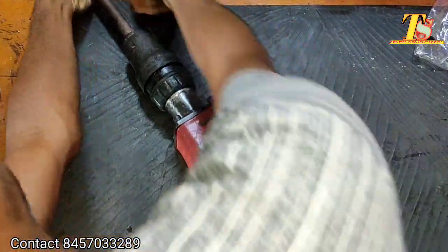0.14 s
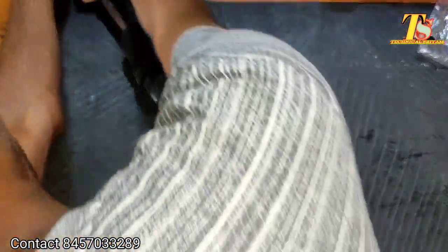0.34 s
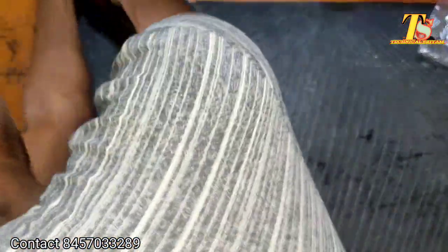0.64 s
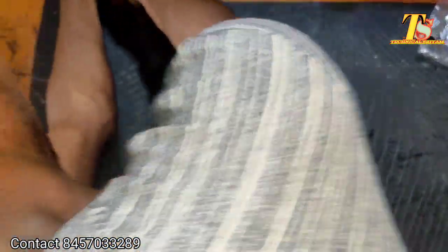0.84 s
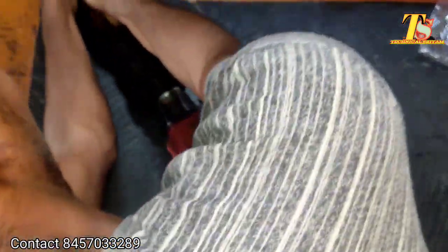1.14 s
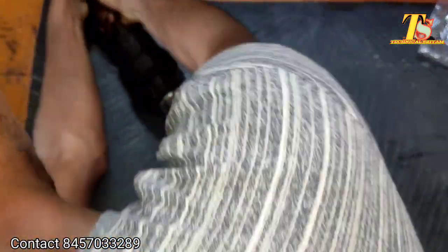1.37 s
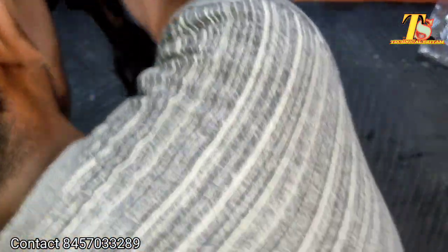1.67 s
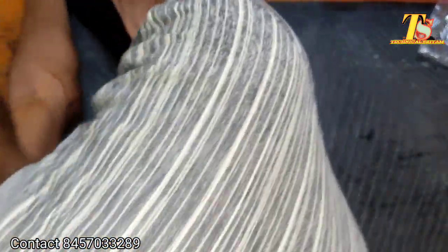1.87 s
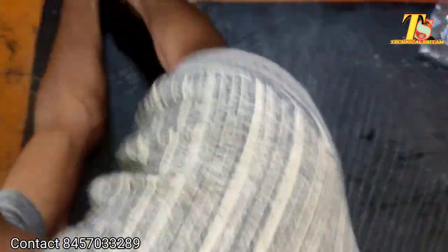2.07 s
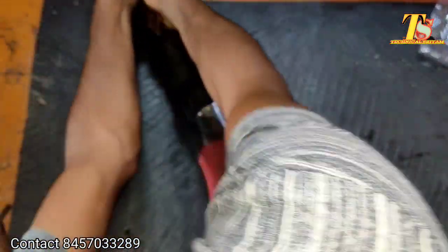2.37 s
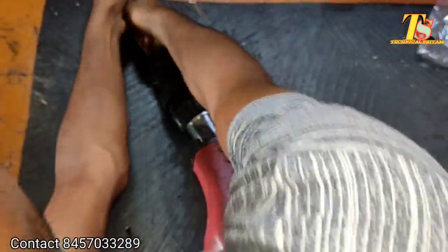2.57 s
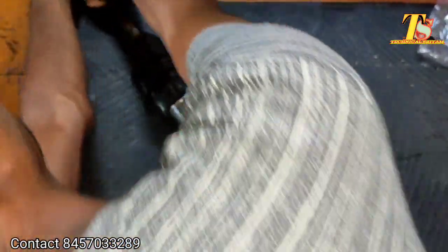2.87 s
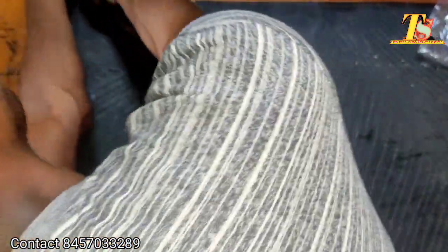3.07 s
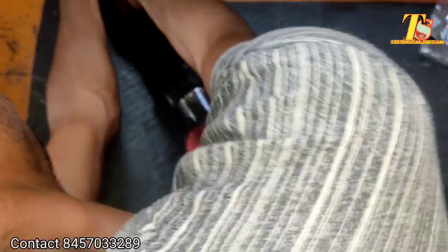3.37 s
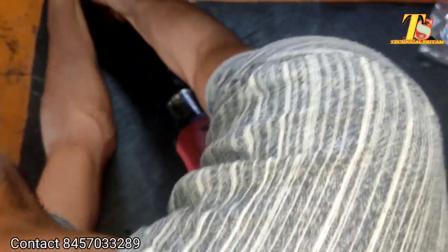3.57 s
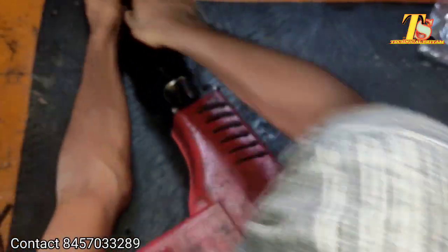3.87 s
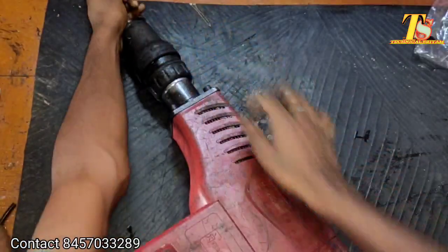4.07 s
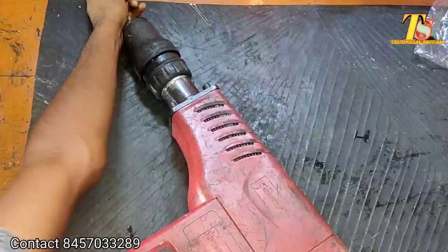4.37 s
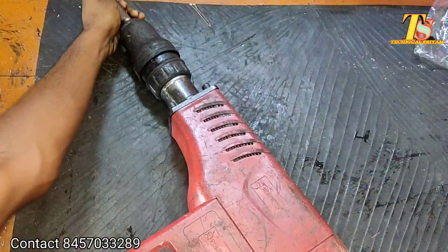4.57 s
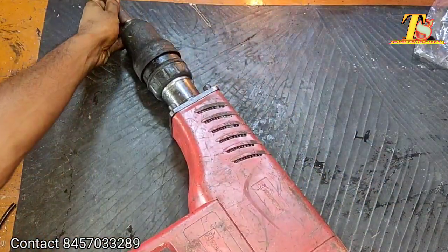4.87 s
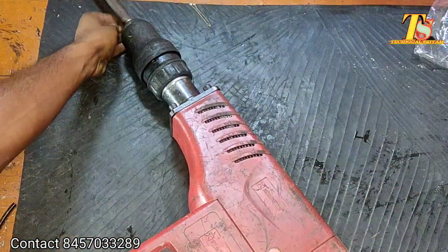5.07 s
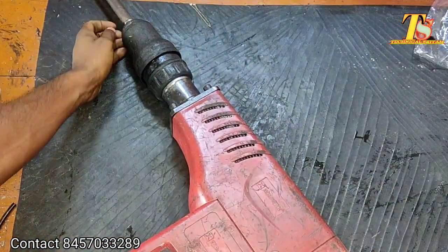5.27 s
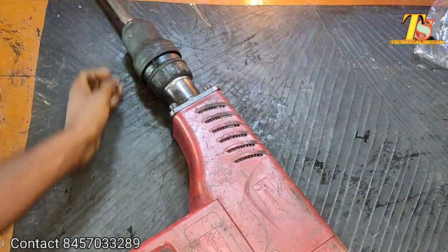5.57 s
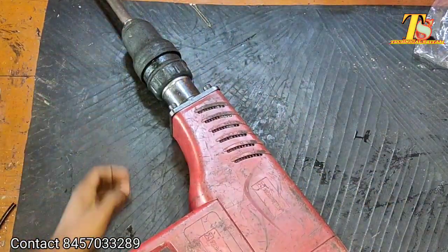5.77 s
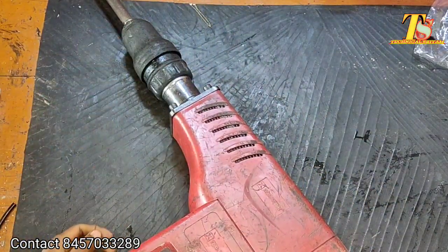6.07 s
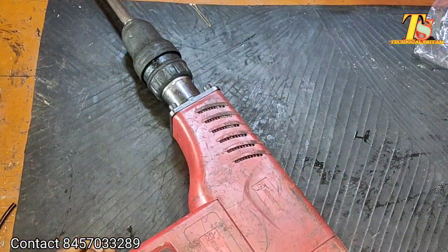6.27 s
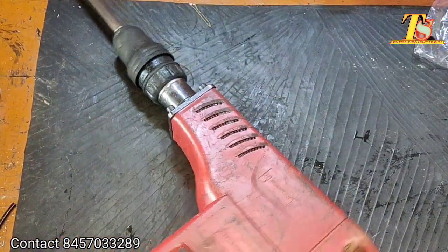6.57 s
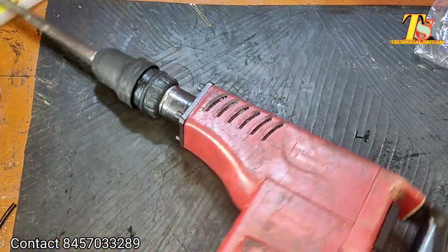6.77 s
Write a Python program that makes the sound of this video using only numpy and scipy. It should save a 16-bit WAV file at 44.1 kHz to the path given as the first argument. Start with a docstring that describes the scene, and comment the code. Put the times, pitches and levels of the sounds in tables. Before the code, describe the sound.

Close stereo pickup in a small workshop: an electric breaker idles with dense rattle, gear whine and fan hiss. Three times its chisel is pressed down, giving about a second of rapid, bright metallic blows as the whine sags and the floor booms. Between bursts it spins back up. After the last, the motor is switched off and the whine slides down while the rattle slows into separate knocks, ending with a scrape.

```python
"""A steady rattle, a gear whine and a fan's hiss come first: an electric demolition hammer idles on a workshop floor.
A motor turns the crank: gears whine by tooth meshing, loose parts rattle as noise bunched once a turn.
Three times the chisel is pushed home and rings as struck modes, the third time with a mere touch before and after.
Then the motor is switched off and coasts down, braked by friction and its fan; the floor booms under the recoil.
A gain control ducks the loud blows and recovers late."""
import sys
import numpy as np
from scipy import signal
from scipy.fft import rfft, irfft, next_fast_len
from scipy.io import wavfile
from scipy.ndimage import uniform_filter1d, minimum_filter1d, map_coordinates

SR = 44100
rng = np.random.default_rng(int(sys.argv[2]) if len(sys.argv) > 2 else 0)


def materialize(psi):
    """Save the field psi as 16-bit PCM at rate SR to the path in sys.argv[1].

    A 1-D psi becomes a single channel; in a 2-D psi each row is a channel.
    """
    bounded = np.clip(np.atleast_2d(psi).T, -1, 1)
    quanta = np.round(bounded * 32767).astype(np.int16)
    wavfile.write(sys.argv[1], SR, quanta)


N = 305169
TIME = np.arange(N) / SR


def undb(db):
    """Amplitude ratio from a level in dB."""
    return 10 ** (np.asarray(db) / 20)


def unit(x):
    """Normalisation to rms 1."""
    return x / np.sqrt(np.mean(x ** 2))


def curves(table):
    """Linear interpolation: the columns of a table as one value per sample."""
    s, *columns = np.transpose(table)
    return [np.interp(TIME, s, c) for c in columns]


def colour(x, points):
    """Spectral shaping: the gain follows (f/Hz, level/dB) points on a logarithmic frequency axis."""
    hz, db = np.transpose(points)
    size = next_fast_len(x.shape[-1] + 4096)
    f = np.maximum(np.fft.rfftfreq(size, 1 / SR), 1)
    gain = undb(np.interp(np.log(f), np.log(hz), db))
    return irfft(rfft(x, size) * gain, size)[..., :x.shape[-1]]


def resonate(x, hz, width_hz):
    """Simple resonance: one peak of gain 1 at its centre."""
    return signal.lfilter(*signal.iirpeak(hz, hz / width_hz, fs=SR), x)


def resonate_twice(x, hz, width_hz):
    """Cascaded resonance: two equal peaks in series have steeper flanks."""
    return resonate(resonate(x, hz, width_hz), hz, width_hz)


def walk(rate):
    """Random fluctuation: chance values, rate per s, joined by straight lines; rms 1."""
    return unit(np.interp(TIME * rate, np.arange(N), rng.standard_normal(N)))


def grains(rate, spread_db):
    """Shot noise: dense clicks of uneven size and random sign."""
    clicks = rng.random(N) < rate / SR
    return unit(clicks * rng.choice([-1, 1], N) * undb(spread_db * rng.standard_normal(N)))


def hump(s, half_s):
    """Gaussian envelope: a smooth swell around one moment."""
    return np.exp(-((TIME - s) / half_s) ** 2)


def spread(pair):
    """Interaural coherence: two unrelated signals reach both ears, their bass nearly alike in both."""
    mid, side = pair
    side = colour(side, [(200, -16.5), (500, -9.5), (1200, -3.0), (3000, -0.5)])
    return unit(np.array([mid + side, mid - side]))


def stereo_noise():
    """Two unrelated channels of white noise."""
    return rng.standard_normal((2, N))


# pushes on the chisel: start t/s, end t/s, blow level/dB, full loss of speed/(turns per s),
# time constant of that loss t/s, added gear whine level/dB
PUSHES = [(.79, 1.637, -.5, 6.36, .3744, -1.5), (2.048, 2.792, -.5, 4.734, .1666, 2.5),
          (3.298, 3.332, -17, 0, .3, 0), (3.333, 3.982, 2, 6.931, .4797, 4), (3.983, 4.02, -3, 0, .3, -4)]
# bending modes of the chisel: f/Hz, width f/Hz, level/dB
CHISEL = [(3395, 310, -18), (5494, 150, -13), (7693, 63, -0.5), (7960, 61, -13), (10670, 105, -3.5),
          (13800, 65, -3.5)]
# broad crack of steel on steel: f/Hz, level/dB
CRACK = [(300, -19), (1200, 16), (3500, 6.5), (7000, 8), (9000, 8), (11300, 16.5), (12500, -22.5)]
BLOW_DB = -9
SEAT_SHIFT_S = 4.5e-5  # the chisel shifts in its seat: rms wander of the ring's arrival time
PORT_LAG = -7  # samples; negative: the ring reaches the right port first


def blows(turns, lag=.15, bounce_db=-2, crack_db=-8.0, contact_s=0.005, chatter_db=-21, grind=0.9,
          uneven_db=1.5):
    """Impact excitation of bending modes: once a turn the striker hits the chisel, which rings and bounces."""
    count = 6  # the blow and five bounces
    hits = np.interp(np.arange(int(turns[-1])) + lag, turns, TIME)
    place, size = rng.random((len(hits), count)), rng.standard_normal((len(hits), count))
    order = np.arange(count)
    times = hits[:, None] + .0056 * (order + (order > 0) * (place - .5) * 1.4)
    bounces_db = (order > 0) * (bounce_db + 3.5 * size)
    # each bounce is weaker on average
    sizes = undb(bounces_db - 2.66 * order + uneven_db * size[:, :1])
    taps = np.zeros(N)
    for start, end, db, *_ in PUSHES:
        pressed = (hits > start) & (hits < end)
        taps[(times[pressed] * SR).astype(int)] = sizes[pressed] * undb(db)
    # each contact is a hard tap with a short grinding burst, followed by fine chatter
    t = TIME[:SR // 4]
    decay = np.exp(-t / contact_s) + undb(chatter_db) * np.exp(-t / 0.04)
    force = signal.fftconvolve(taps, decay)[:N]
    contact = unit(taps) + grind * unit(force * stereo_noise())
    ring = unit(sum(undb(db) * resonate(contact, hz, width) for hz, width, db in CHISEL))
    # the shifting seat makes the ring waver in pitch
    seated = np.arange(N) + SEAT_SHIFT_S * SR * walk(120)
    ring = np.array([map_coordinates(side, [seated], mode="nearest") for side in ring])
    ring[1] = np.roll(ring[1], PORT_LAG)
    crack = unit(colour(force * stereo_noise(), CRACK))
    busy = sum(end - start for start, end, *_ in PUSHES) / TIME[-1]  # share of the time spent pushing
    return undb(BLOW_DB) * np.sqrt(busy) * unit(ring + undb(crack_db) * crack)


# free speed (turns per s), time constant of regaining it (s), start within the turn (turns)
FREE_SPEED, RECOVER_S, START_TURN = 29.802, .2985, .088
# switch-off (s), friction (turns per s per s), speed at which fan and friction brake alike (turns per s)
OFF_S, FRICTION, EVEN_SPEED = 4.487, 5.9855, 21.043


def crank():
    """Torque balance: the speed (turns per s) sags under load, recovers, and falls by friction and fan drag."""
    speed = np.full(N, FREE_SPEED)
    for start, end, _, sag, sag_s, _ in PUSHES:
        bogged = 1 - np.exp(-np.clip(TIME - start, 0, end - start) / sag_s)
        speed = speed - sag * bogged * np.exp(-np.maximum(TIME - end, 0) / RECOVER_S)
    # constant friction with drag as speed squared gives a tangent law
    off_angle = np.arctan(np.interp(OFF_S, TIME, speed) / EVEN_SPEED)
    braked = off_angle - FRICTION / EVEN_SPEED * (TIME - OFF_S)
    return np.where(TIME < OFF_S, speed, EVEN_SPEED * np.tan(braked))


GRIP_S = 0.048  # time constant for the load to take hold or let go


def pushing():
    """First-order lag: firmness of the push (0-1), and its extra gear whine (dB)."""
    held = sum(((TIME > start) & (TIME < end)) * np.array([[1.], [whine_db]])
               for start, end, *_, whine_db in PUSHES)
    keep = np.exp(-1 / (GRIP_S * SR))
    return signal.lfilter([1 - keep], [1, -keep], held)


def stroke(turns, centre, width):
    """Periodic compression: a hump once a turn, as the piston squeezes its air cushion; rms 1."""
    phase = (turns - centre + .5) % 1 - .5
    return unit(np.exp(-.5 * (phase / width) ** 2))


# resonances of the housing: f/Hz, width f/Hz, level/dB
HOUSING = [(345, 29, 2), (585, 200, -3), (850, 120, -1), (1090, 130, -2.5), (1540, 120, -5.5),
           (2045, 72, 2), (2540, 300, -4), (3040, 72, -9), (3720, 146, 2), (4140, 200, -8),
           (6560, 240, -1.5), (6900, 200, -7)]


def housing(x):
    """Modal ringing: knocks excite the housing's resonances, whose levels wander as the point of impact does."""
    vary_db, knocks_per_s = 3.5, 16
    return sum(undb(db + vary_db * walk(knocks_per_s)) * resonate(x, hz, width)
               for hz, width, db in HOUSING)


# colour of the rattle at speed: f/Hz, level/dB
RATTLE = [(120, -68), (190, -1), (235, -21), (285, -40), (340, -29), (400, 5.5), (720, 10), (870, 5.5),
          (1130, 16), (1400, 7.5), (2400, 2.5), (2950, -4.5), (3450, 4.5), (3950, 3.5), (4500, -9.5),
          (7000, -9), (14000, -2.5)]
# colour of the rattle when coasting: f/Hz, level/dB
COAST = [(60, -50), (105, 7), (150, -16), (225, 0.5), (295, 1), (420, 7), (620, 10.5), (780, 4.5),
         (1150, 6), (1420, 0.5), (2000, -3.5), (2600, -3.5), (3600, -2), (4100, -1), (4800, -6),
         (6000, -9.5), (9000, -11), (14000, -31)]
# level at free speed (dB), change under a push (dB), fall (dB per octave of speed lost)
RATTLE_DB, RATTLE_PUSHED_DB, RATTLE_FALL_DB = -29.5, 3, 1.9
# below this speed (turns per s) the rattle fades faster (further dB per octave)
LIMP_SPEED, LIMP_FALL_DB = 11.2, 6
# share that is one knock a turn (0-1): at free speed, gained per octave of speed lost, upper limit
KNOCK_SHARE, KNOCK_PER_OCTAVE, KNOCK_MOST = 0.25, 0.4, 0.6


def rattle(turns, speed, knock, ring_fast_db=-7, ring_slow_db=5):
    """Modulated shot noise: gear play and piston chatter bunch at each compression; slow running rings more."""
    knock = np.clip(knock, 0, 1)
    load = np.sqrt(1 - knock + knock * stroke(turns, centre=0.0012, width=0.082) ** 2)
    uneven = undb(.7 * walk(45) + 1.5 * walk(400))
    chatter = spread([grains(rate=5000, spread_db=1.5) for _ in range(2)]) * load * uneven
    ring = housing(chatter)
    roar = unit(colour(chatter + undb(ring_fast_db) * ring, RATTLE))
    clatter = unit(colour(chatter + undb(ring_slow_db) * ring, COAST))
    fast = np.clip((speed - 14) / 13, 0, 1)
    return np.sqrt(fast) * roar + np.sqrt(1 - fast) * clatter


# pitch of the gear whine while the motor is powered: t/s, f/Hz
WHINE = [(0, 1780), (.8, 1775), (1.05, 1690), (1.2, 1520), (1.62, 1480), (1.8, 1590), (2.05, 1710),
         (2.22, 1690), (2.35, 1530), (2.8, 1480), (3.0, 1610), (3.3, 1740), (3.55, 1710), (3.67, 1610),
         (3.76, 1510), (3.98, 1480), (4.2, 1610), (4.487, 1730)]
# squeals as the freed motor picks up: t/s, half length t/s, level/dB against the whine
SQUEALS = [(1.87, .04, 1), (1.95, .03, -1), (3.01, .07, -3), (4.17, .03, -5)]
# how the gearbox radiates the mesh of the teeth: f/Hz, level/dB
GEARBOX = [(340, 4), (400, -2), (480, 4), (620, 10), (720, 2), (820, 6), (980, 2), (1130, 9), (1350, -1),
           (1450, 2.5), (1580, 0), (1780, 3), (2200, -4), (2650, -8), (2950, 2), (3250, 4), (3450, 1),
           (3650, 3.5), (4200, -12), (5500, -18)]
GEAR_TEETH = 60  # tooth contacts per turn of the crank, heard once the motor is off
# level at free speed (dB), change under a push (dB), fall (dB per octave of speed lost)
GEAR_DB, GEAR_PUSHED_DB, GEAR_FALL_DB = -35.5, 12, .3
GEAR_STRAIN_DB, GEAR_LIMP_DB = 7.5, 7.5  # growth at full strain (dB); fall at a crawl (dB per octave)
FREE_WHINE_HZ, STRAIN_HZ = 1780, 290  # free pitch, and its drop at full strain
SLACK_RASP_HZ, SLACK_RASP_WIDTH_HZ, SLACK_RASP_DB = 3700, 700, -10  # slack teeth grate in the gear case
COAST_WHINE_DB = 3  # rise of the fundamental when coasting
CRAWL_SPEED, CRAWL_OVERTONE_DB = 13, 11  # below this speed (turns per s) the overtones grow (dB)


def gears(turns, speed, pushed, gear_db, surge=0.013, flutter=0.055, strain_flutter=.035,
          slack_flutter=.015, second_db=-6, third_db=-8, rasp_db=-11):
    """Tooth-mesh tone: compression loads the teeth, and the crank springs forward past dead centre."""
    slack = 1 - pushed  # slack teeth whirr all the way round, with more overtones
    coasting = np.clip((24 - speed) / 4, 0, 1)
    crawling = np.clip((CRAWL_SPEED - speed) / 5, 0, 1)
    hz = np.where(TIME < OFF_S, curves(WHINE)[0], GEAR_TEETH * speed)
    strain = pushed * np.clip((FREE_WHINE_HZ - hz) / STRAIN_HZ, 0, 1)
    # phase of the mesh in cycles, then in radians with its own flutter at each ear
    surging_hz = hz * (1 + surge * np.cos(2 * np.pi * turns))
    mesh = np.cumsum(surging_hz) / SR + 0.32 * (1 - .35 * coasting) * walk(35)
    squeal = np.sin(4 * np.pi * mesh) * sum(undb(db) * hump(s, half_s) for s, half_s, db in SQUEALS)
    depth = flutter + strain_flutter * strain + slack_flutter * slack * (1 - coasting)
    mesh = 2 * np.pi * (mesh + depth * np.array([walk(350), walk(350)]))
    overtones = undb(second_db) * np.sin(2 * mesh) + undb(third_db) * np.sin(3 * mesh)
    # a strained whine throbs more: its steady part shrinks
    squeeze = (1 - .5 * slack) * (1 - .3 * coasting) * stroke(turns, centre=0.01, width=0.085)
    steady = .34 + .35 * (1 - strain) * (1 - .5 * pushed) + .2 * coasting
    pressure = (steady + squeeze) * undb(1.4 * walk(40))
    # at speed the sliding teeth also rasp, which rings the gear case
    rasp = unit(resonate_twice(stereo_noise(), 1730, 260)) * (1 - coasting) * (1 - strain)
    grate = unit(resonate_twice(stereo_noise(), SLACK_RASP_HZ, SLACK_RASP_WIDTH_HZ))
    grate = grate * undb(SLACK_RASP_DB) * (1 - coasting)
    fundamental = np.sin(mesh) * undb(COAST_WHINE_DB * coasting)
    whirr = slack * (overtones * undb(CRAWL_OVERTONE_DB * crawling) + grate)
    teeth = fundamental + whirr + squeal + undb(rasp_db) * rasp
    return unit(colour(teeth * pressure, GEARBOX)) * undb(gear_db + GEAR_STRAIN_DB * strain)


# short clacks and bursts of the machine: t/s, level/dB, pitch f/Hz, bright tick level/dB, decay t/s
CLACKS = [(.162, -18, 3470, -24, .012), (2.688, -6.5, 3400, -28, .018), (2.724, -9, 3530, -28, .018),
          (2.750, -9, 3400, -28, .018), (2.771, -2, 3220, -28, 0.0097), (3.276, -12, 1300, -20, .008),
          (3.895, -2, 5440, -23, 0.017), (5.774, -8, 1700, -9, .007), (5.87, -19, 3900, -9, 0.007),
          (6.636, -29, 1900, 6, .006)]


def clacks():
    """Damped resonance: short clacks of varying pitch start at once, die away and ring the housing."""
    noise, out = rng.standard_normal(N), np.zeros(N)
    tick = colour(noise, [(3000, -24), (7000, -17), (11000, -0.5), (14000, -10)])
    for s, db, hz, tick_db, decay_s in CLACKS:
        clack = resonate_twice(noise, hz, .27 * hz) + undb(tick_db) * tick
        decay = (TIME >= s) * np.exp(-abs(TIME - s) / decay_s)
        out += undb(db) * decay * clack
    return out + housing(out)


# colour of the fan: f/Hz, level/dB
FAN = [(100, 4.5), (600, 11.5), (3300, 3), (5500, 0.5), (9000, -5.5), (11000, 2), (14000, -1.5)]
# level at free speed (dB), change under a push (dB), fall (dB per octave of speed lost)
FAN_DB, FAN_PUSHED_DB, FAN_FALL_DB = -29, 5.5, 9


def fan(slowed, pushed):
    """Broadband flow noise: the fan's hiss fades as the speed falls and flutters at random."""
    fan_db = FAN_DB + FAN_PUSHED_DB * pushed - FAN_FALL_DB * slowed
    return unit(colour(spread(stereo_noise()), FAN)) * undb(fan_db + 2.0 * walk(70))


# colour of the floor's boom: f/Hz, level/dB
FLOOR = [(20, 2), (55, -3.5), (110, 2.5), (170, -25), (900, -37)]
# level at free speed (dB), change under a push (dB), fall (dB per octave of speed lost)
SWAY_DB, SWAY_PUSHED_DB, SWAY_FALL_DB = -48.5, 26, 39.5
BOOM_DB, BOOM_PUSHED_DB = -48, 7.5  # level and change under a push
# coasting, the casing hops hardest near one speed (turns per s, width, dB)
# and settles below another (turns per s, dB)
HOP_SPEED, HOP_WIDTH, HOP_DB, SETTLE_SPEED, SETTLE_DB = 23, 2.1, 11.5, 22.1, -32


def rumble(turns, speed, pushed):
    """Forced vibration: the piston's recoil rocks the casing and booms the boards, until too slow to hop."""
    sway_db = SWAY_DB + SWAY_PUSHED_DB * pushed - SWAY_FALL_DB * np.log2(FREE_SPEED / speed)
    hopping = (TIME > OFF_S) * np.exp(-((speed - HOP_SPEED) / HOP_WIDTH) ** 2)
    settled = np.clip(SETTLE_SPEED - speed, 0, 1)
    boom_db = BOOM_DB + BOOM_PUSHED_DB * pushed + HOP_DB * hopping + SETTLE_DB * settled
    sway = unit(np.sin(2 * np.pi * turns) * undb(1.0 * walk(9.9)))
    # one impulse a turn
    recoil = np.diff(np.floor(turns + 0.067), prepend=0) * undb(3.2 * walk(25))
    boom = unit(colour(resonate(recoil, 104, 16) + 1.4 * resonate(recoil, 54, 18), FLOOR))
    return sway * undb(sway_db) + boom * undb(boom_db)


# buzz of the casing on the floor: f/Hz, level/dB
BUZZ = [(100, -37), (165, -9), (230, 8), (285, -6), (335, 14.5), (420, 1), (620, 10), (850, 1),
        (1100, -5.5), (2000, -31)]
# the casing is shifted and judders over the floor: t/s, half length t/s, level/dB
SHIFTS = [(0.72, 0.14, -56), (3.15, 0.083, -36.5), (3.278, 0.019, -27.5), (6.904, 0.14, -34.5)]
# colour of the casing's rolling on the boards: f/Hz, level/dB
ROLL = [(40, -23), (90, -4), (140, -14), (200, 7), (260, 2.5), (500, -22)]
BUZZ_DB, BUZZ_PUSHED_DB = -40.5, -9  # level and change under a push
SCRAPE_DB = -3.5  # hiss of the scrape against its judder
ROLL_SPEED, ROLL_DB = 15, -43  # rolling sets in below this speed (turns per s), up to this level


def casing(speed, pushed):
    """Contact noise: the casing buzzes on the floor, rolls under the last slow strokes, scrapes when shifted."""
    shifted = sum(undb(db) * hump(s, half_s) for s, half_s, db in SHIFTS)
    buzz = unit(colour(spread(stereo_noise()), BUZZ))
    scrape = unit(colour(stereo_noise(), [(600, 2), (3000, 3), (11000, 12)]))
    roll = unit(colour(spread(stereo_noise()), ROLL)) * np.clip((ROLL_SPEED - speed) / 4, 0, 1)
    buzzing = buzz * (undb(BUZZ_DB + BUZZ_PUSHED_DB * pushed) + shifted)
    return buzzing + scrape * undb(SCRAPE_DB) * shifted + roll * undb(ROLL_DB)


# air stirred at the microphone: t/s, level/dB
DRAUGHT = [(0, -39), (.3, -65), (.42, -42), (.8, -34), (1.13, -26.5), (1.25, -31.5), (4.2, -71),
           (6.92, -52)]
# soft bumps against the microphone: t/s, half length t/s, level/dB
BUMPS = [(0.367, 0.0016, -20), (1.142, 0.0026, -16), (2.072, 0.0037, -16.5)]


def draught(apart=0.55):
    """Turbulence: eddies buffet the two ports partly alike, mostly in the bass, with a few soft bumps."""
    eddies = rng.standard_normal(N) + apart * stereo_noise()
    air = unit(colour(eddies, [(12, 7.5), (30, -8), (60, -4.5), (130, -11.5), (500, -7), (2000, -74)]))
    bumps = sum(undb(db) * hump(s, half_s) for s, half_s, db in BUMPS)
    return air * undb(curves(DRAUGHT)[0] + 2 * walk(63)) + bumps


def room(x, wet_db=-6, t60=.33):
    """Reverberation: direct sound, then an exponentially decaying tail, different at each ear."""
    t = TIME[:SR // 2]
    tail = spread(rng.standard_normal((2, len(t)))) * undb(-60 * t / t60) * (t > .004)
    tail = unit(tail) / np.sqrt(len(t))
    return x + undb(wet_db) * signal.fftconvolve(x, tail, axes=1)[:, :N]


# slow swell and ebb of rattle and fan: t/s, level/dB
SWELL = [(0, 0.5), (.25, -0.5), (.7, 3.5), (1.2, 0), (1.9, 1), (2.4, 2.5), (2.95, 0.5), (3.3, 2), (3.9, 4),
         (4.25, 0.5), (4.7, -1), (5.0, 1), (6.0, 4), (6.92, 4.5)]


def scene():
    """Superposition: crank speed and push drive the machine's sources; clacks and draught are added."""
    speed, (pushed, whine_db) = crank(), pushing()
    turns = START_TURN + np.cumsum(speed) / SR
    slowed = np.log2(FREE_SPEED / speed)  # octaves below free speed
    limp = np.maximum(np.log2(LIMP_SPEED / speed), 0)  # octaves below a crawl
    rattle_db = RATTLE_DB + RATTLE_PUSHED_DB * pushed - RATTLE_FALL_DB * slowed - LIMP_FALL_DB * limp
    gear_db = GEAR_DB + GEAR_PUSHED_DB * pushed + whine_db - GEAR_FALL_DB * slowed - GEAR_LIMP_DB * limp
    knock = np.minimum(KNOCK_SHARE + KNOCK_PER_OCTAVE * slowed, KNOCK_MOST)
    running = rattle(turns, speed, knock) * undb(rattle_db) + fan(slowed, pushed)
    running = running * undb(curves(SWELL)[0])
    chisel = room(blows(turns), wet_db=-7, t60=.36)
    machine = room(running + clacks(), wet_db=-4.5, t60=0.079)
    whine = room(gears(turns, speed, pushed, gear_db), wet_db=-9, t60=.25)
    airborne = undb(-2.0) * (machine + whine + chisel)
    return airborne + rumble(turns, speed, pushed) + casing(speed, pushed) + draught()


def gain_control(x, top_db=-14.5, hold_s=0.12, release_db_per_s=170):
    """Look-ahead compression: the gain ducks ahead of loud sound, holds, then rises at a limited rate."""
    ahead_s, smooth_s = .022, .006
    half = int(0.032 * SR / 2)
    power = uniform_filter1d(np.mean(x ** 2, axis=0), 2 * half + 1, origin=half)
    cut_db = np.minimum(top_db - 10 * np.log10(np.maximum(power, 1e-12)), 0)
    half = int(hold_s * SR / 2)
    held_db = minimum_filter1d(cut_db, 2 * half + 1, origin=half)
    rise_db = release_db_per_s * TIME
    gain_db = np.minimum.accumulate(held_db - rise_db) + rise_db
    smooth_db = uniform_filter1d(gain_db, int(smooth_s * SR))
    return x * undb(np.interp(TIME + ahead_s, TIME, smooth_db))


# resonances of the left microphone port: f/Hz, level/dB
LEFT_PORT = [(60, 4.5), (700, -4), (3300, 7), (5500, 6), (7700, 8.5), (9000, 7), (10000, 5.5), (11000, 9),
             (12500, 5.5), (14000, 0)]
# resonances of the right microphone port: f/Hz, level/dB
RIGHT_PORT = [(60, 3.5), (700, -5), (3300, 7), (5500, 6.5), (7700, 11), (9000, 18), (10000, 9.5),
              (11000, 0), (12500, 1.5), (14000, -3)]
TOP_HZ = 14300  # upper edge of the treble


def record(dry, ceiling=0.23):
    """Transduction: port resonance, gain control, soft saturation of the peaks and a steep low-pass."""
    ports = np.array([colour(dry[0], LEFT_PORT), colour(dry[1], RIGHT_PORT)])
    heard = gain_control(ports)
    rounded = heard / (1 + (heard / ceiling) ** 4) ** (1 / 4)
    return signal.sosfilt(signal.ellip(10, .2, 70, TOP_HZ, fs=SR, output="sos"), rounded)


dry = scene()
out = record(dry)
materialize(out)
```